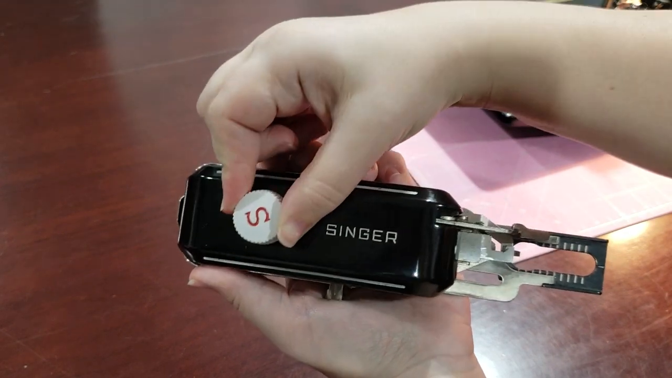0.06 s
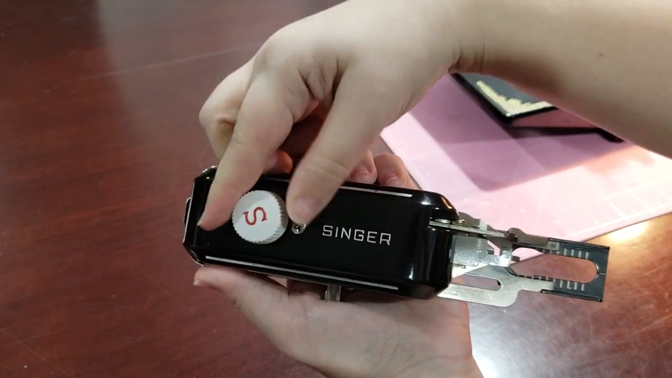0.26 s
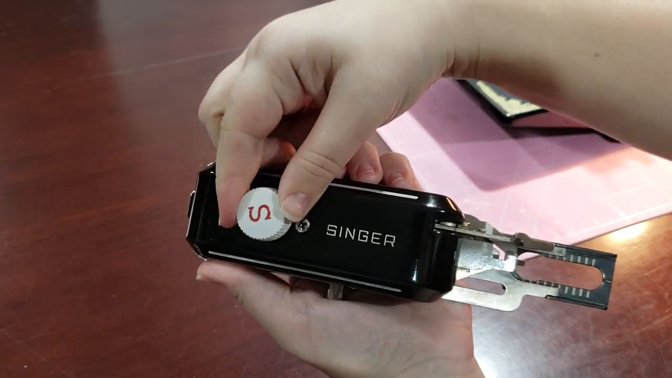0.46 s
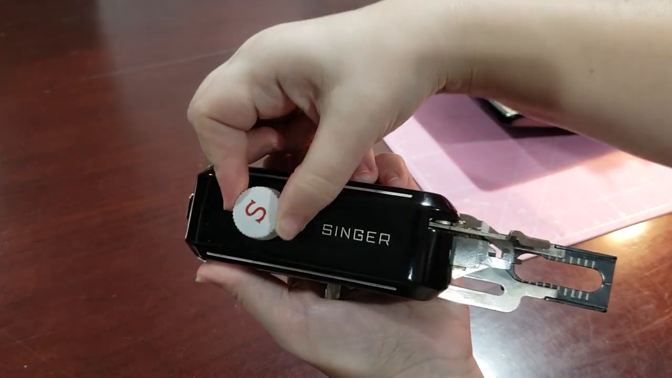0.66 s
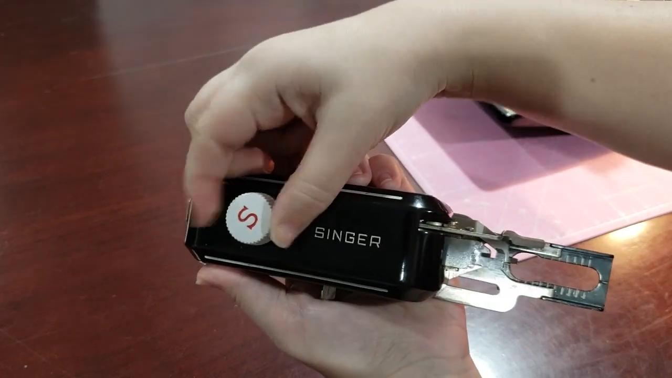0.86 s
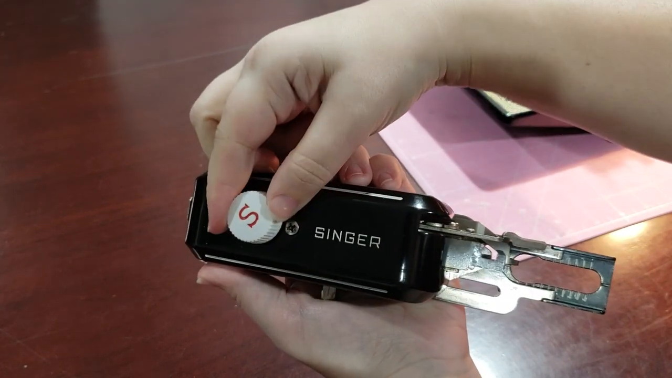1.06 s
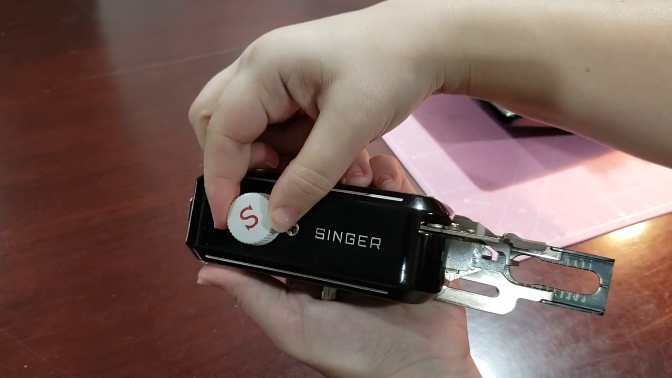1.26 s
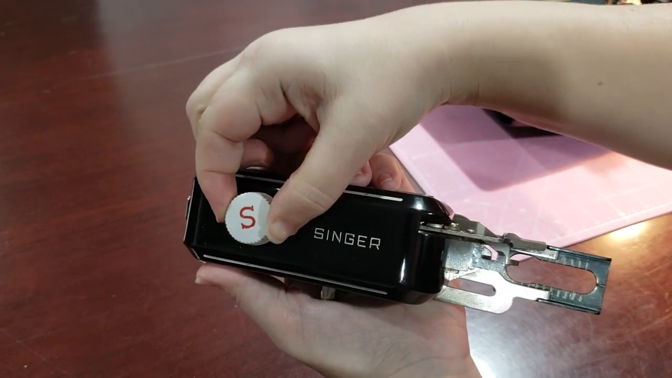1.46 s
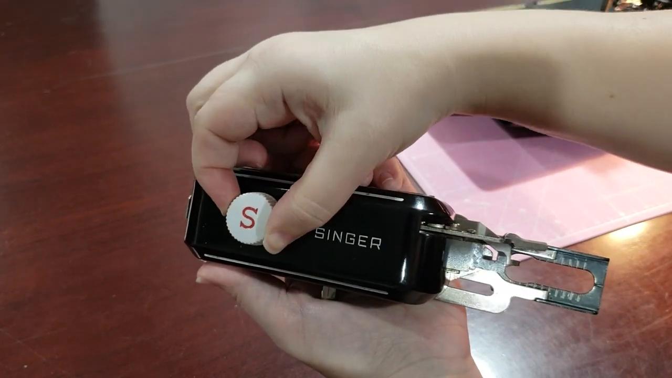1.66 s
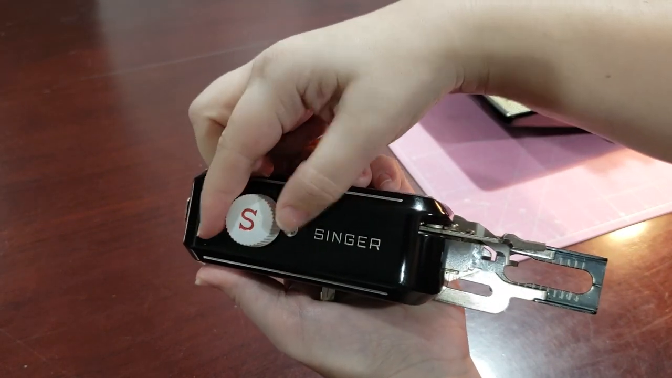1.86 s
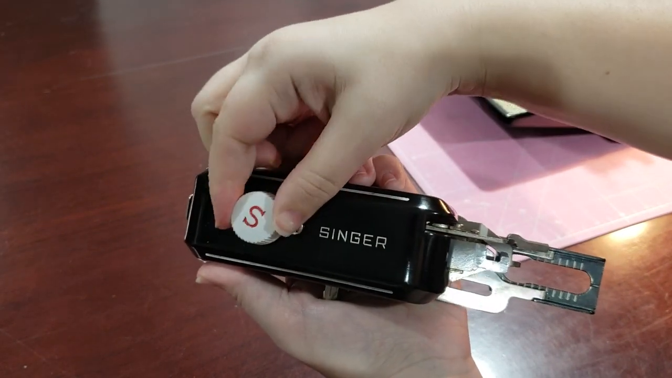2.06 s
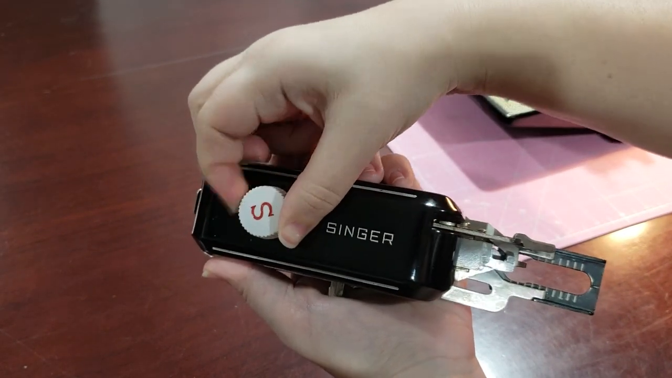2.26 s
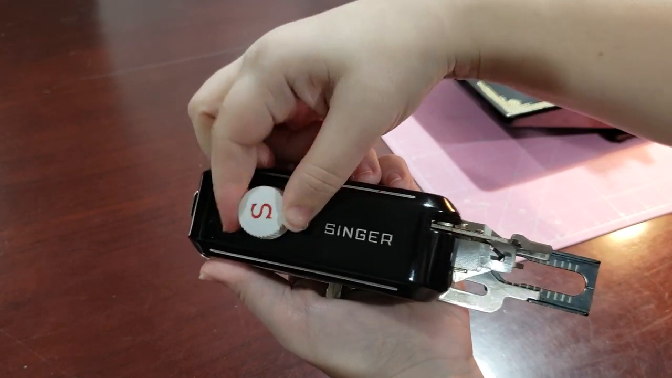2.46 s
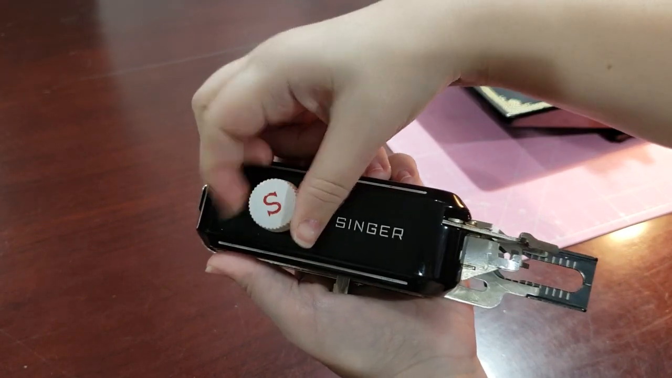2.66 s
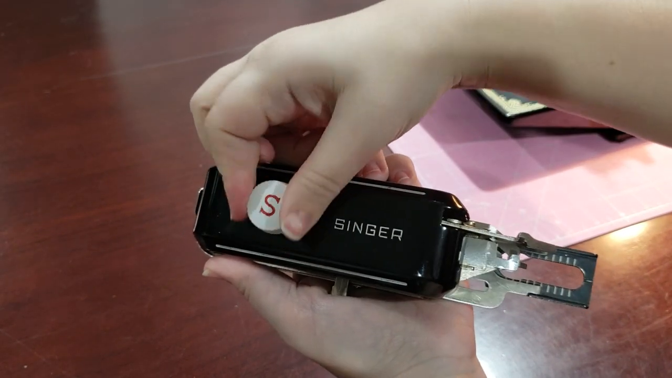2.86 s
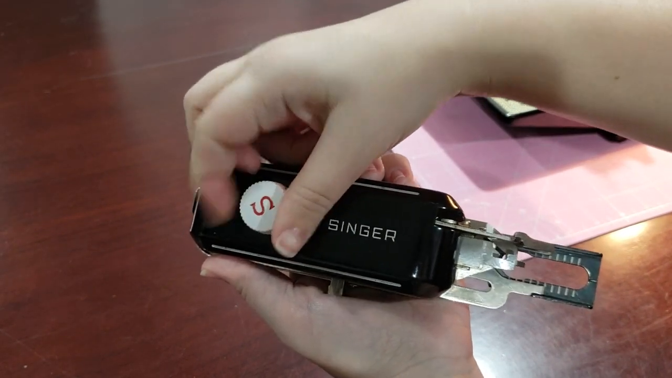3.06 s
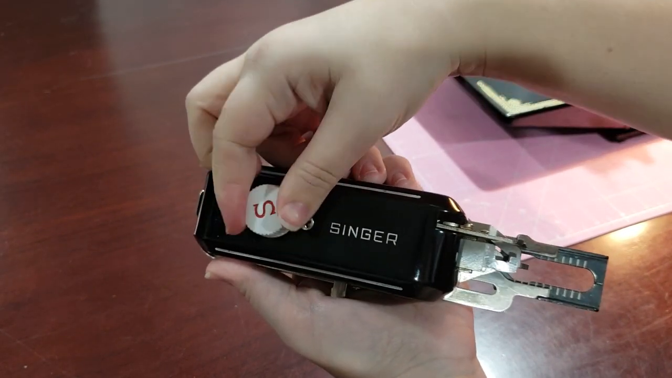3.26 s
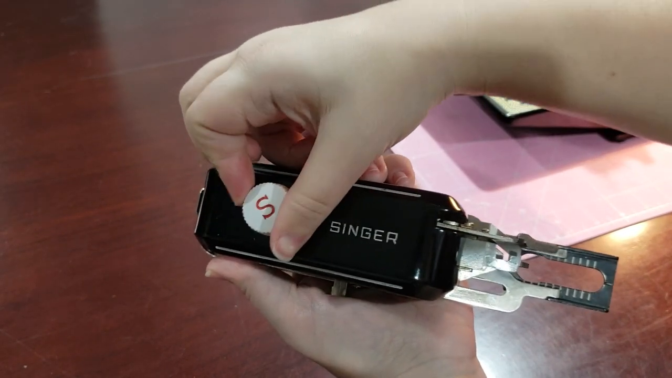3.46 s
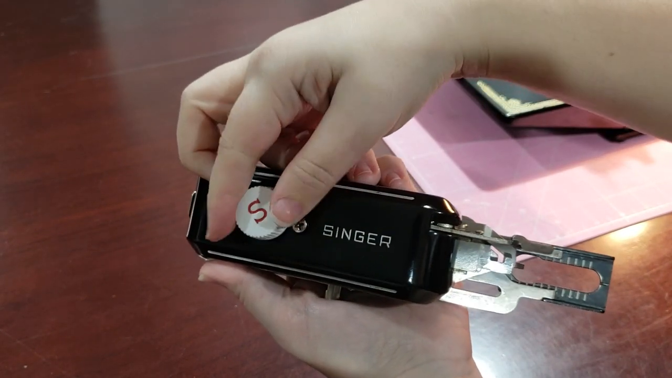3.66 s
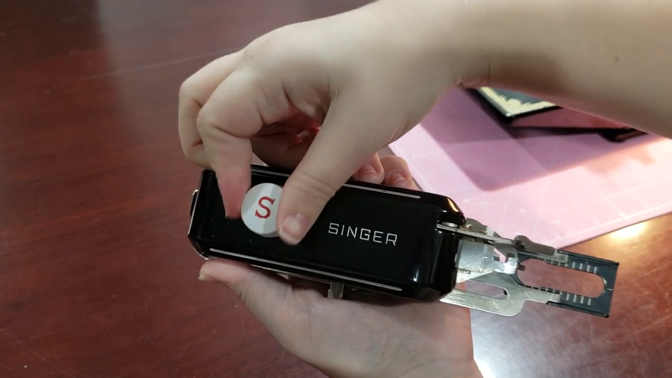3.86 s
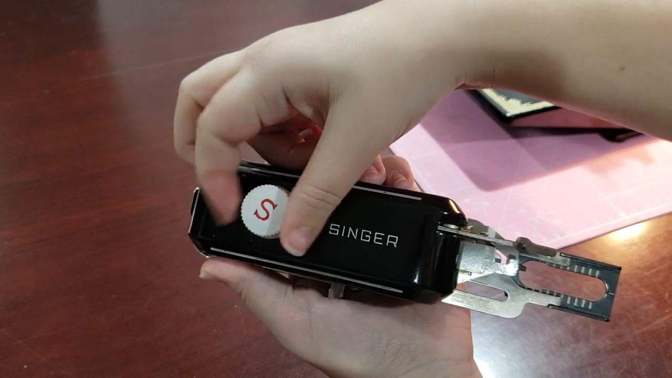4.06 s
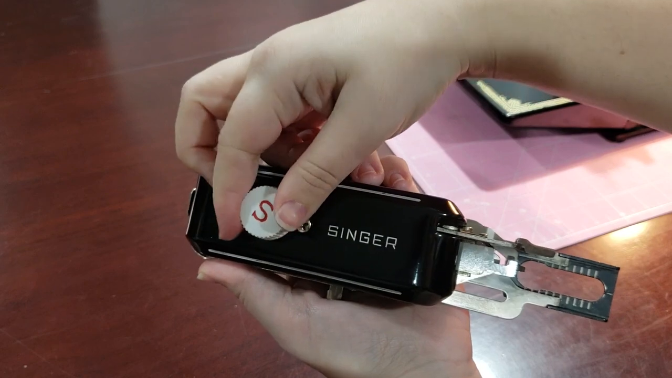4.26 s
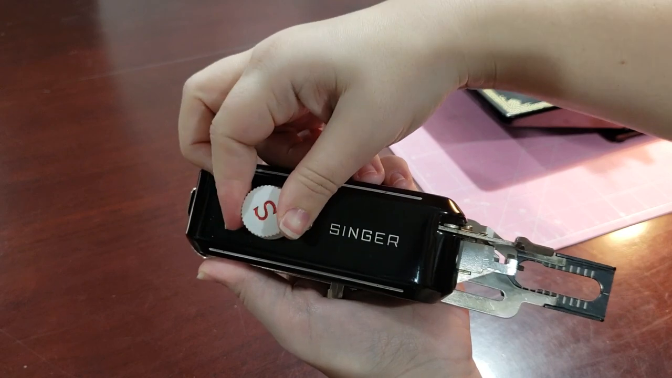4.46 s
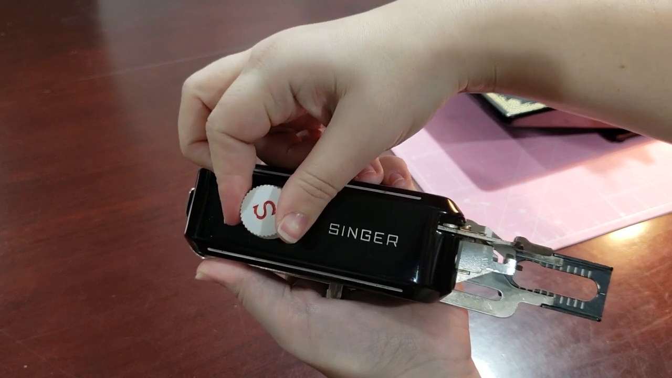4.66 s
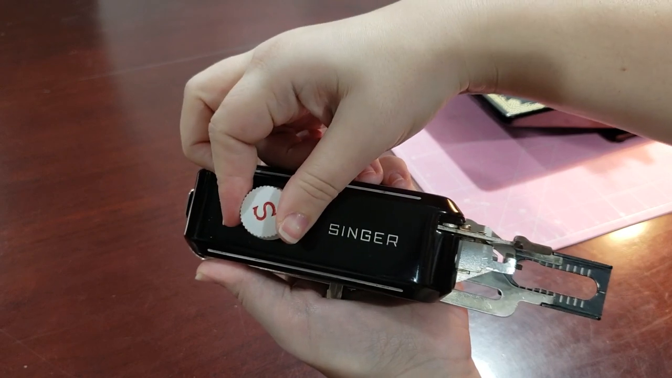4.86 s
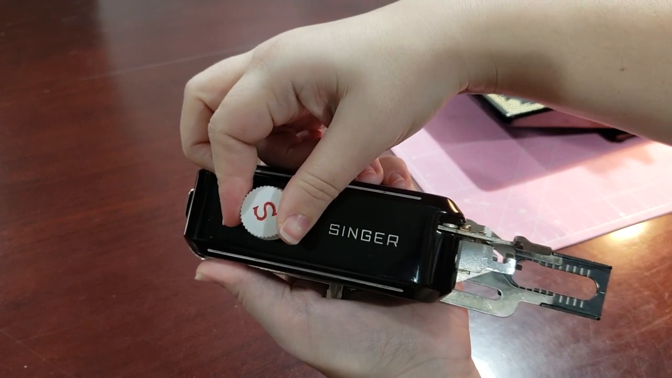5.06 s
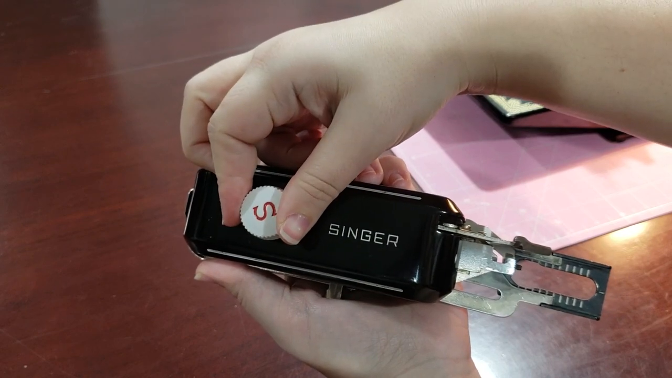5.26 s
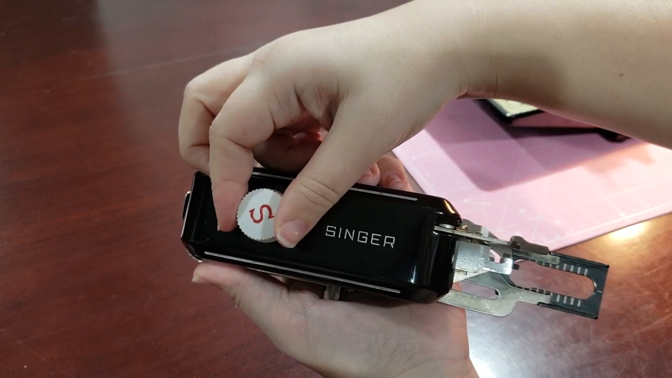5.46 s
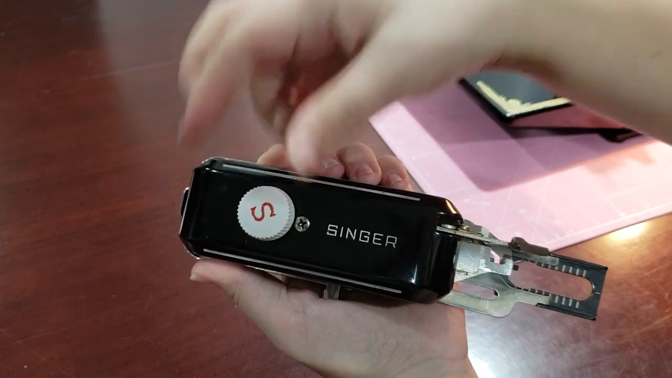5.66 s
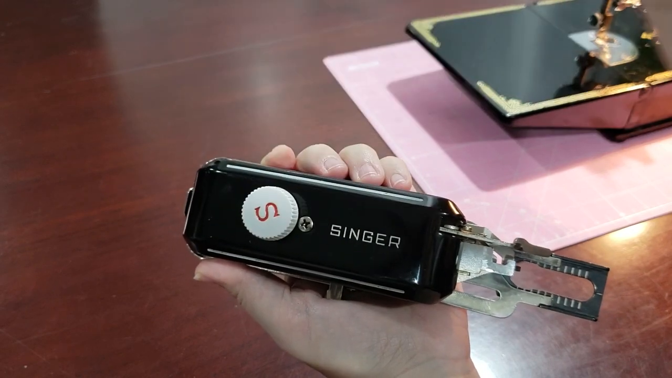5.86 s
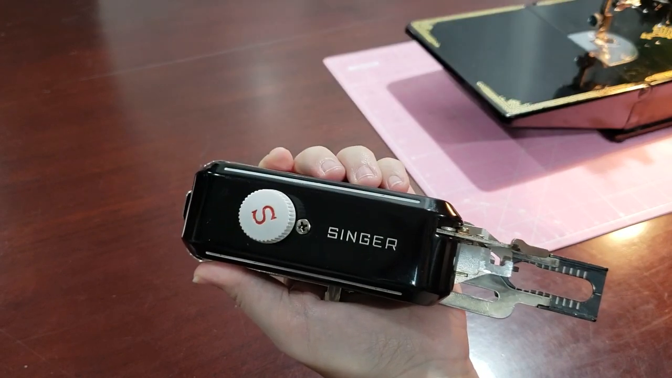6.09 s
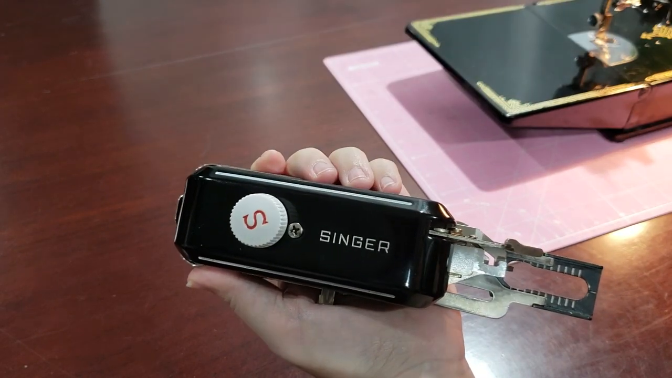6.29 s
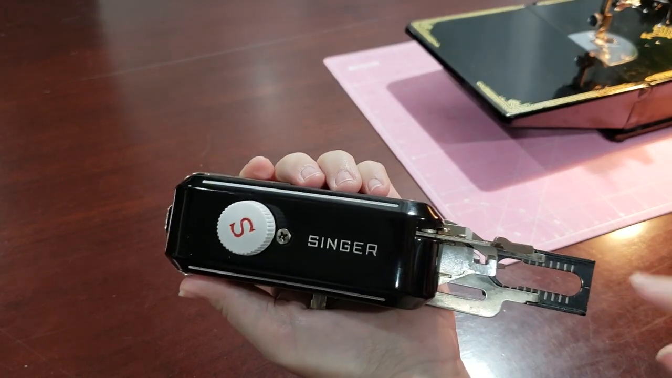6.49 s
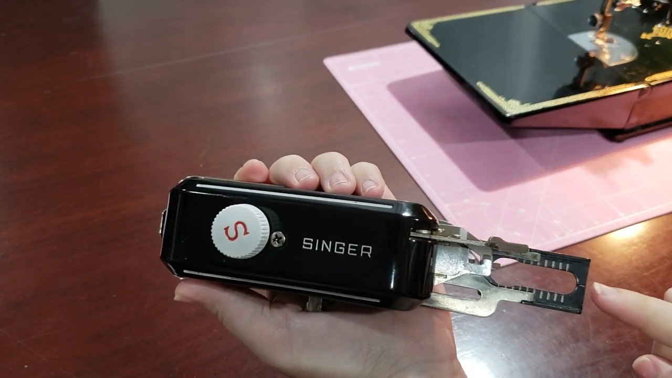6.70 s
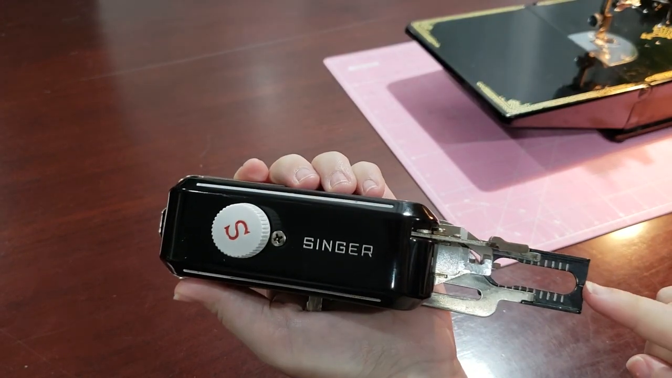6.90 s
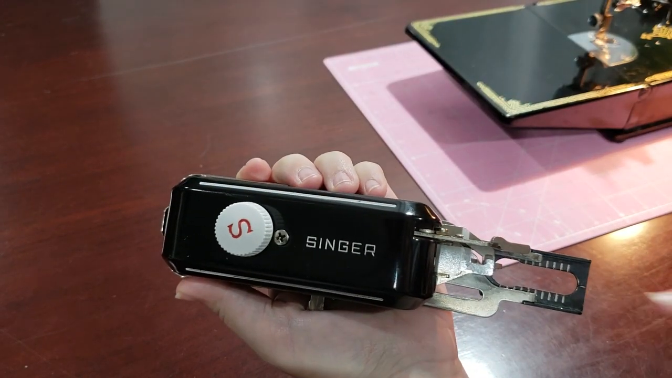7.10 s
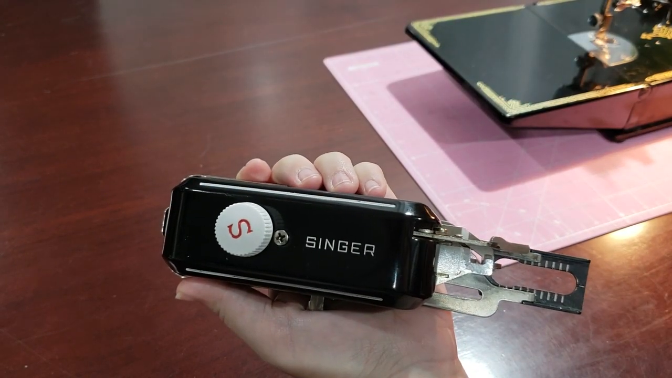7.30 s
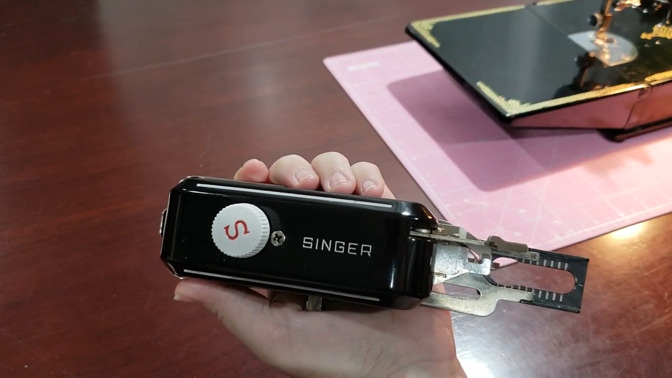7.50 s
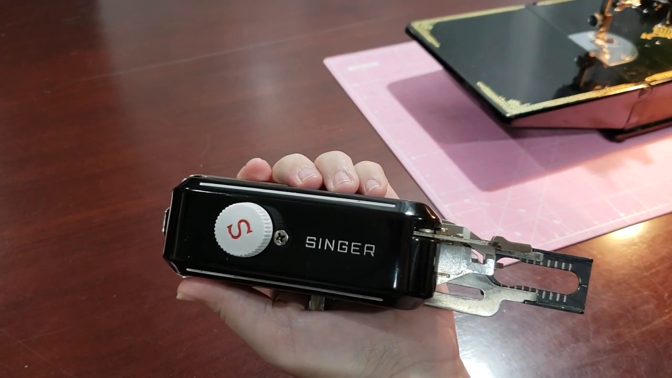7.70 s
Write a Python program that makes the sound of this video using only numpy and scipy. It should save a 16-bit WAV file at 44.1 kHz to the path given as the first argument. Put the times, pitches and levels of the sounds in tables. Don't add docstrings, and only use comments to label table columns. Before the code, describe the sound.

A small steel mechanism clicks tooth by tooth, singly then in rapid clusters, followed by soft skin slips and near silence.

```python
import sys
import numpy as np
from scipy import signal
from scipy.fft import rfft, irfft, next_fast_len
from scipy.io import wavfile
from scipy.ndimage import uniform_filter1d

SR = 44100
rng = np.random.default_rng(int(sys.argv[2]) if len(sys.argv) > 2 else 0)


def volts_from_decibels(level):
    exponent = np.asarray(level, float) / 20
    return 10 ** exponent


def waveform_to_disk(signal):
    frames = np.transpose(np.atleast_2d(signal))
    scaled = np.clip(frames, -1, 1) * 32767
    samples = np.round(scaled).astype(np.int16)
    wavfile.write(sys.argv[1], SR, samples)


N = 341157
LEAD_S = .003


def add(track, sound, s):
    i = int(round(s * SR))
    a, b = max(i, 0), min(i + sound.shape[1], N)
    track[:, a:b] += sound[:, a - i:b - i]


def unit(x):
    return x / np.sqrt(np.mean(x ** 2))


def lean(pan_db):
    return volts_from_decibels(np.array([[.5], [-.5]]) * pan_db)


def on_log(table, hz):
    f, v = np.transpose(table)
    return np.interp(np.log(np.maximum(hz, 1)), np.log(f), v)


def coloured(size, gain):
    hz = np.arange(size // 2 + 1) * SR / size
    return irfft(rfft(rng.standard_normal((2, size))) * gain(hz), size)


def walk(rate):
    k = int(SR / rate)
    held = np.repeat(rng.standard_normal(N // k + 1), k)
    return unit(uniform_filter1d(uniform_filter1d(held, k), k)[:N])


def floor():
    # (frequency [Hz], density [dB per Hz])
    air_colour = [(25, -28), (44, -27.5), (60, -13.5), (100, -11.5), (180, -8.5), (260, -7), (320, -14.5),
                  (650, -16), (1100, -27.5), (2200, -31.5), (2700, -24.5), (3300, -35), (8000, -41.5),
                  (15500, -41)]
    # (frequency [Hz], correlation [-1 to 1])
    air_likeness = [(60, 0.79), (130, 0.88), (290, 0.94), (640, 0.34), (1410, -0.11), (3100, -0.31),
                    (6820, 0.018), (15000, -0.52)]
    # (frequency [Hz], level [dB], waver [dB])
    motor_lines = [(56.8, -61, .4), (113.6, -74, 1.5), (120, -67.5, 1.0), (254, -76, 3), (442.5, -79, 1.5),
                   (614, -84, 1.5), (883, -87, 1.0)]
    hz = np.arange(N // 2 + 1) * SR / N
    alike = np.clip(on_log(air_likeness, hz), -.9, .99)
    mid, side = rfft(coloured(N, lambda f: volts_from_decibels(on_log(air_colour, f))))
    air = irfft(mid * np.sqrt(1 + alike) + np.array([[1], [-1]]) * side * np.sqrt(1 - alike), N)
    t = np.arange(N) / SR
    hum = np.zeros(N)
    for f, db, waver_db in motor_lines:
        level = np.sqrt(2) * volts_from_decibels(db + waver_db * walk(rate=6))
        hum += level * np.sin(2 * np.pi * f * t)
    air_db = -60 + .5 * walk(1.5)
    return volts_from_decibels(air_db) * unit(air) * lean(0.5) + hum


def raw_capsule(filter_on_s=.3582):
    t = np.arange(N) / SR - filter_on_s
    hiss = volts_from_decibels(-67.5) * rng.standard_normal((2, N))
    rumble_hz = 70
    rumble = unit(coloured(N, lambda hz: (hz > 15) / (1 + (hz / rumble_hz) ** 2))[0])
    swing = -volts_from_decibels(-41.5) * np.cos(2 * np.pi * 115 * t) * np.exp(-(t / 0.006) ** 2)
    return (t < 0) * (hiss + volts_from_decibels(-62) * rumble + swing)


def body(count=160, size=2600):
    # (frequency [Hz], level [dB], t60 [s], left minus right [dB])
    case_modes = [(980, -12, .028, -2), (1152, 23, 0.034, 1), (1532, -11.5, 0.053, -1.5),
                  (1597, -4, .022, -1.5), (1760, -6.5, 0.011, -4.5), (2107, -9.5, 0.047, 0.5),
                  (2301, -4, 0.016, 0), (2986, -1.5, 0.013, -1.5), (3620, -16, 0.023, 3),
                  (3980, -9.5, 0.013, 4.5), (4500, -11.5, 0.024, -1.5), (4826, -8, 0.024, 3.5),
                  (5610, -11.5, 0.019, 3), (5774, -6.5, .011, 7), (6770, -7.5, 0.012, -1)]
    # (frequency [Hz], level [dB])
    plate_colour = [(900, -10), (2500, -8.5), (3200, -1.5), (4100, -10.5), (5900, -6.5), (7800, -5),
                    (8900, -15.5), (10200, -5), (14200, -2.5), (15900, -5), (16600, -18.5)]
    group_edges_hz = (1300, 2500, 8500)
    plate_t60_s, plate_db = 0.0079, -10.5
    port_lag_s = 1 / SR
    case = np.array(case_modes)
    plate_hz = np.linspace(1050, 16500, count) + 40 * rng.standard_normal(count)
    hz = np.r_[case[:, 0], plate_hz]
    db = np.r_[case[:, 1], plate_db + on_log(plate_colour, plate_hz)]
    t60 = np.r_[case[:, 2], np.full(count, plate_t60_s)]
    pan_db = np.r_[case[:, 3], 3.0 * rng.standard_normal(count)]
    turn = np.clip(hz / 1400, 0, np.pi) * (2 * rng.random(len(hz)) - 1)
    start = np.clip(hz / 2500, 0, np.pi) * rng.standard_normal(len(hz))
    t = np.arange(size) / SR
    fade = np.exp(-np.log(1000) * t / t60[:, None])
    rings = []
    for side in (1, -1):
        level = volts_from_decibels(db + side * pan_db / 2)[:, None]
        phase = (start + side * turn / 2)[:, None]
        heard_t = t - side * port_lag_s / 2
        rings.append(level * fade * np.sin(2 * np.pi * hz[:, None] * heard_t + phase))
    radiate = signal.butter(N=9, Wn=962.4, btype="high", fs=SR, output="sos")
    hand_db = -19
    return signal.sosfilt(radiate, rings) + volts_from_decibels(hand_db) * np.array(rings), np.searchsorted(group_edges_hz, hz)


def chatter(rebound_db, scatter_db=6.0, density=.3, size=400):
    rise_s, fall_s, cloud_db, rebound_s = 0.0015, 0.0032, -12.5, 0.0018
    start = int(LEAD_S * SR)
    t = (np.arange(size) - start) / SR
    chance = rng.standard_normal((3, size))
    cloud = (rng.random(size) < density) * np.sign(chance[0]) * volts_from_decibels(cloud_db + scatter_db * chance[1])
    force = cloud * np.where(t < 0, np.exp(3 * t / rise_s), np.exp(-t / fall_s))
    force[start] += 1
    rebound = start + int(rebound_s * SR * (1 + .06 * chance[2, 0]))
    force[rebound] += volts_from_decibels(rebound_db + 1.3 * chance[2, 1])
    return force


def strikes(table, rings, group, rebound_db, late_s, vary_db=1.2, port_db=2.5, size=8192):
    group_db = (-8, -3.5, -9, -3.5)
    group_pan_db = (-1, -5, 2, -2.5)
    # (level [dB], t60 [s])
    scatter = [(-10.5, 0.12), (-6, 0.082), (-6, 0.091), (-8.5, 0.082)]
    scatter_rise_s = 0.0021
    room_db, room_t60_s = -33.5, 0.39
    track = np.zeros((2, N))
    t = np.arange(size) / SR - LEAD_S
    power = np.abs(rfft(rings, size)) ** 2
    colour = [np.sqrt(uniform_filter1d(power[:, group == k].sum(axis=1), size=10)) for k in range(4)]
    for s, db, boom_db, body_db, sizzle_db, pan_db in table:
        shares = volts_from_decibels(vary_db * rng.standard_normal(len(group)) + port_db * rng.standard_normal((2, len(group))))
        force = chatter(rebound_db)[None]
        for k, rel_db in enumerate((boom_db, body_db, 0, sizzle_db)):
            modes = np.einsum("cm,cmt->ct", shares[:, group == k], rings[:, group == k])
            ring = signal.fftconvolve(modes, force, axes=1)
            ring = ring / np.sqrt(np.mean(ring[:, :len(force[0])] ** 2))
            near_db, near_t60_s = scatter[k]
            fade = volts_from_decibels(near_db - 60 * t / near_t60_s) + volts_from_decibels(room_db - 60 * t / room_t60_s)
            tail = unit(coloured(size, lambda hz: colour[k])) * np.clip(t / scatter_rise_s, 0, 1) * fade
            gain = volts_from_decibels(db + rel_db + group_db[k])
            add(track, gain * lean(pan_db + group_pan_db[k]) * ring, s - LEAD_S + late_s)
            add(track, gain * tail, s - LEAD_S + late_s)
    return track


def pawl_drops(rings, group):
    # (time [s], upper ring [dB], case boom over ring [dB], left minus right [dB])
    earlier_drop = (-.016, -24, -10, 0)
    slow_drops = [(0.0261, -20, -8.5, -1), (0.5838, -23, -8, 2), (0.7122, -22, -9, 1.5),
                  (1.272, -21.5, -16, 3.5), (1.4204, -21, -15.5, 1), (1.5593, -23.5, -20, -0.5),
                  (2.0901, -23, -19.5, 1), (2.578, -24, -9, 1), (2.9334, -23.5, -10, 2),
                  (3.3736, -23.5, -10, 2), (3.904, -25, -9.5, 2), (4.4481, -23.5, -11, 3.5),
                  (4.582, -23.5, -10.5, 3.0)]
    quick_drops = [(0.7357, -20.5, -10, 2.0), (0.7623, -22, -4, -1.5), (1.6268, -21, -21, 0.5),
                   (2.1522, -20.5, -21, 4), (2.2052, -18.5, -18, 4), (2.2339, -22.5, -6.5, -2.5),
                   (2.2666, -22, -7, 2), (2.612, -20.5, -10, 2.5), (2.6256, -23.5, -4, 1),
                   (2.6387, -22, -7.5, -2.5), (2.657, -22, -2.5, 2), (2.6805, -22, -8.5, 1.5),
                   (2.9668, -21.5, -16, -1.5), (2.9871, -18.5, -16, 2.5), (3.015, -19, -19, -0.5),
                   (3.0333, -20, -12.5, 4), (3.0693, -21.5, -8.5, 1), (3.4307, -21, -19.5, 1),
                   (3.46, -20.5, -15.5, 3.5), (3.476, -20.5, -13.5, -2), (3.4996, -21.5, -10.5, 2.5),
                   (3.5362, -19, -13, 1.5), (3.9607, -21.5, -9.5, 1), (3.9795, -21.5, -8, 2),
                   (3.995, -21, -6, -1), (4.0261, -22.5, -7.5, -0.5)]
    usual_db = -21.5
    body_follows, sizzle_follows = 0.36, 0.49
    # drops, then body and sizzle of a usual drop over its ring [dB]
    kinds = ((slow_drops, -7, -4.5), ([earlier_drop, *quick_drops], -5, -2))
    rows = []
    for table, body_db, sizzle_db in kinds:
        for s, db, boom_db, pan_db in table:
            louder_db = db - usual_db
            drop_body_db = body_db + (body_follows - 1) * louder_db
            drop_sizzle_db = sizzle_db + (sizzle_follows - 1) * louder_db
            rows.append((s, db, boom_db, drop_body_db, drop_sizzle_db, pan_db))
    return strikes(sorted(rows), rings, group, rebound_db=-7, late_s=0.00045)


def knob_ticks(rings, group):
    # (time [s], upper ring [dB], case boom over ring [dB], plate sizzle over ring [dB])
    ticks = [(0.241, -60, 12, -14), (0.9034, -70, 10, -14), (0.94, -73, 10, -15),
             (1.0976, -44, -1.5, -12.5), (1.2032, -59, -4, -25.5), (1.815, -75, 26.5, -16),
             (2.3684, -63, -3, -13), (2.397, -70, 6, -14), (2.506, -52, 3.5, -28),
             (2.8794, -52.5, 2.5, -15), (3.2924, -60, 10.5, -19), (3.6497, -71, 8, -12),
             (4.1719, -53, -13, -24), (4.3281, -60, -1, -21), (4.3754, -67.5, 13, -15),
             (6.881, -72, 13, -12), (6.9693, -49, 1, -2.5)]
    rows = [(s, db, boom_db, -7.5 + .2 * min(boom_db, 6), sizzle_db, 2)
            for s, db, boom_db, sizzle_db in ticks]
    return strikes(rows, rings, group, rebound_db=-5.5, late_s=0.00058)


def slips(table, pan_db, rise, share=0.256, above_db=-6):
    skin_top_hz, grit_db = 7740, 3.0
    track = np.zeros((2, N))
    for s, db, length, centre_hz, octaves in table:
        size = next_fast_len(int(5 * length * SR))
        t = np.arange(size) / SR / length
        hiss = coloured(size, lambda hz: np.exp(-(np.log2((hz + 1) / centre_hz) / octaves) ** 2)
                        * np.where(hz > skin_top_hz, volts_from_decibels(above_db), 1))
        hiss = unit(hiss + share * hiss[::-1])
        grit = volts_from_decibels(grit_db * unit(uniform_filter1d(rng.standard_normal(size), size=90)))
        shape = np.minimum(t / rise, 1) * (np.exp(-1.6 * t ** 2) * grit + 0.34 * np.exp(-1.0 * t))
        add(track, volts_from_decibels(db) * hiss * shape * lean(pan_db), s)
    return track


def knob_slips():
    finger_slips = [(1.208, -73.5, 0.072, 3970, 1.2), (1.668, -52.5, .03, 5000, 3.4),
                    (1.852, -62, 0.056, 5900, 3.5), (3.759, -62.5, 0.033, 3800, 1.25),
                    (4.116, -57, 0.028, 3140, 1.1), (4.274, -66.5, 0.039, 2500, 1.04),
                    (4.774, -64, 0.036, 5300, 1.1), (5.438, -49.5, .025, 446, 1.4),
                    (5.439, -51, .014, 3100, 0.2), (5.439, -52, 0.042, 2480, 1.9),
                    (6.969, -64, .005, 13500, .4)]
    return slips(finger_slips, pan_db=2.5, rise=0.034)


def palm_slips():
    # (time [s], level [dB], length [s], centre [Hz], width [octaves])
    palm_shifts = [(5.86, -83, 0.074, 7000, 0.59), (5.92, -79, 0.015, 5000, 1.6),
                   (6.107, -68, 0.0094, 2600, 0.3), (6.28, -73, 0.21, 2400, 1.01),
                   (6.432, -71, 0.043, 3740, 2.5), (6.434, -63, 0.0097, 2980, 0.43)]
    return slips(palm_shifts, pan_db=-5, rise=0.053)


def table_slips():
    # (time [s], level [dB], length [s], centre [Hz], width [octaves])
    table_brushes = [(7.305, -75.5, 0.04, 4000, 2.1), (7.52, -76, .04, 4020, 2.1),
                     (7.54, -68.5, 0.074, 2100, 1.3), (7.585, -69, 0.076, 4500, 2.3)]
    return slips(table_brushes, pan_db=3, rise=.2)


def scene():
    rings, group = body()
    steel = pawl_drops(rings, group) + knob_ticks(rings, group)
    skin = knob_slips() + palm_slips() + table_slips()
    return floor() + steel + skin


def top_cut(x):
    return signal.sosfilt(signal.butter(12, 16980, fs=SR, output="sos"), x)


def record(dry):
    top = signal.ellip(6, .3, 22, 15900, fs=SR, output="sos")
    return top_cut(signal.sosfilt(top, dry + raw_capsule()))


dry = scene()
out = record(dry)
waveform_to_disk(out)
```